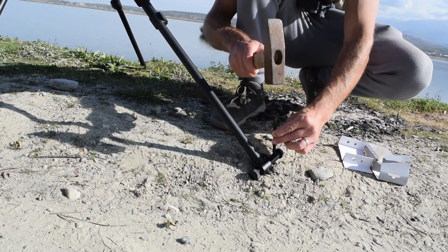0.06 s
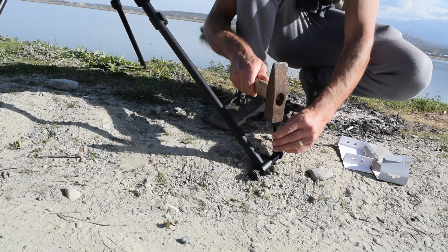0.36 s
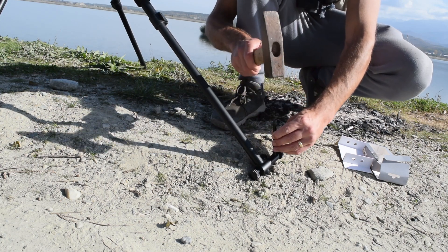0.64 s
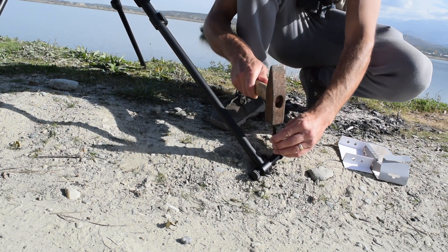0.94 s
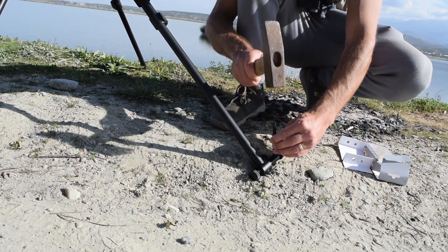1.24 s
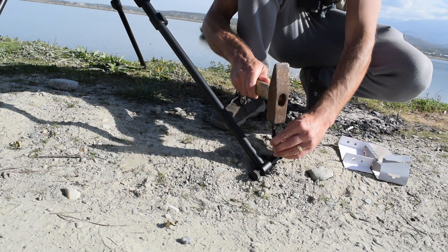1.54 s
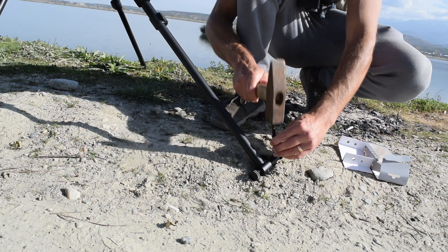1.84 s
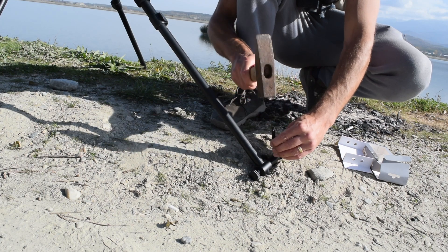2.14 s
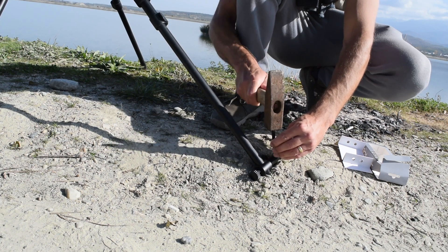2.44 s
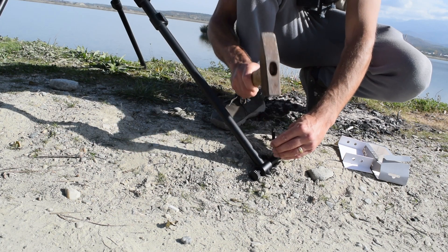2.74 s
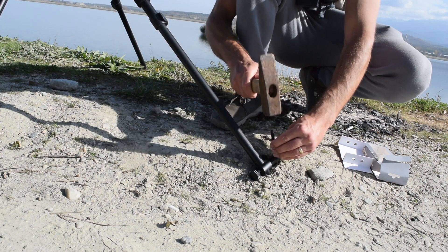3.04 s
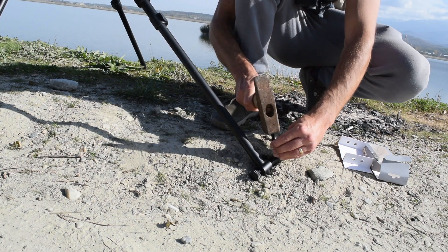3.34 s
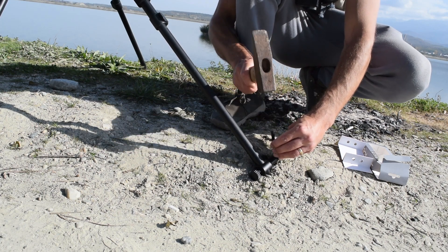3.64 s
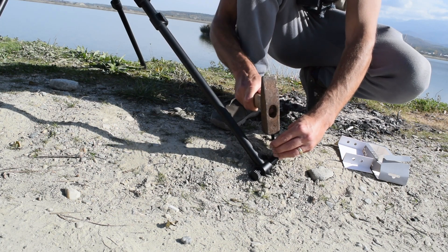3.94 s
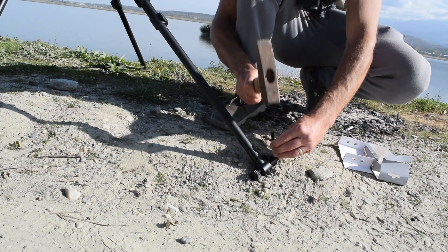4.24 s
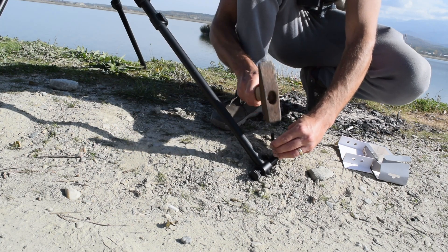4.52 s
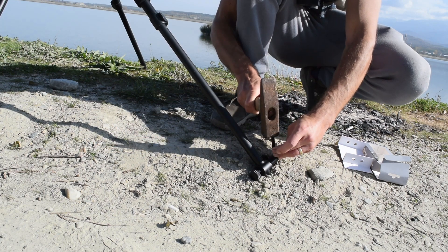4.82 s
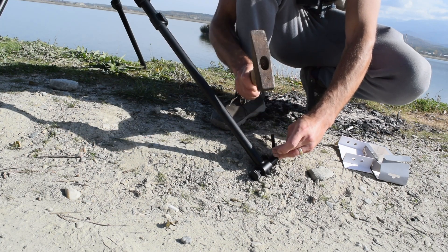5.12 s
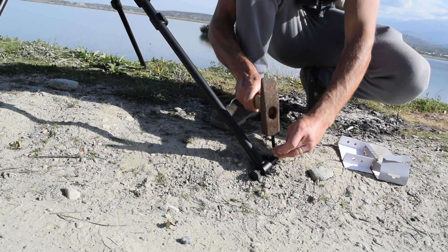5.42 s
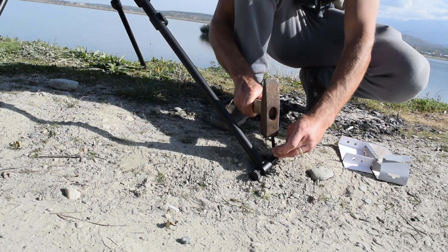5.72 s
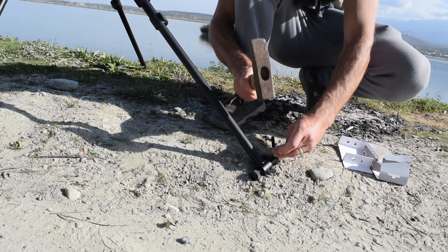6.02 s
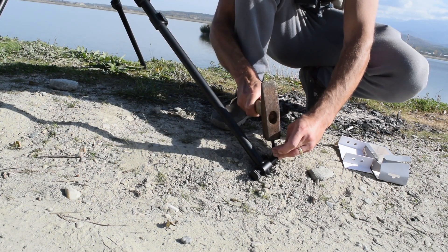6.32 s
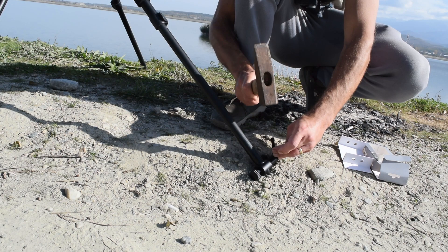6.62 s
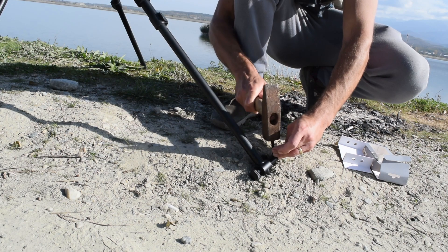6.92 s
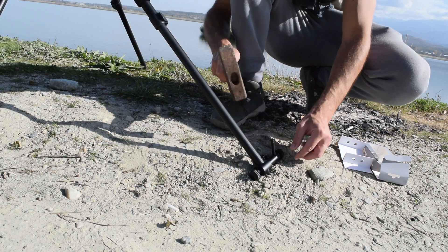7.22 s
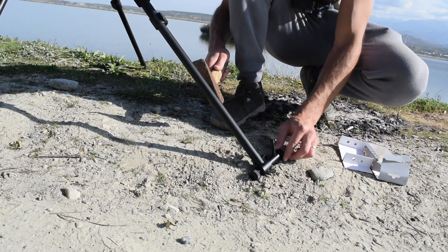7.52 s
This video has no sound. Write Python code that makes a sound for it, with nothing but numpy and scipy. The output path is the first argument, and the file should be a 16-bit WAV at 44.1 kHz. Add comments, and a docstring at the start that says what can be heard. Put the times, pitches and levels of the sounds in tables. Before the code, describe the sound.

Outdoors, close to the microphone, fourteen even hammer blows knock a metal pin into dry, hard soil. Every strike cracks and rings briefly with a bright steel ping, and the metal stand being pinned down clacks and settles right after. The pace quickens slightly, and the pings and thuds grow stronger toward the end. A very light breeze and a few thin, faraway bird notes lie underneath.

```python
"""A steel hammer drives a metal pin through the foot of a tube stand into hard ground, about twice a second.
Each impact cracks and excites the normal modes of the bodies it reaches: the soil thuds, the stand
knocks, and pin, hammer head and tube ring. The loose foot then rattles in inelastic bounces.
Behind the work are a light breeze and a few distant birds, in the open air by a lake.
The close microphone overloads on the sharpest peaks."""
import sys
import numpy as np
from scipy import signal
from scipy.fft import rfft, irfft, next_fast_len
from scipy.io import wavfile
from scipy.ndimage import uniform_filter1d

SR = 44100
rng = np.random.default_rng(int(sys.argv[2]) if len(sys.argv) > 2 else 0)


def digitize_waveform(pressure):
    """Quantize a signal to 16-bit integers and store it at the path in sys.argv[1].

    Rows of a 2-D input are taken as channels; values are limited to [-1, 1].
    """
    field = np.atleast_2d(pressure).T
    bounded = np.clip(field, -1, 1)
    quanta = np.round(bounded * 32767).astype(np.int16)
    wavfile.write(sys.argv[1], SR, quanta)


N = 333396

# Spectrum of the breeze: frequency_hz, relative_density_db
BREEZE_SPECTRUM = [(25, -6), (50, -7.5), (125, -1), (220, -5.5), (320, -8.5), (720, -7.5), (1300, -13),
                   (1650, -13.5), (2100, -16.5), (3100, -20.5), (3500, -16.5), (4000, -23), (10000, -32.5),
                   (16000, -42)]
# Likeness of the breeze at left and right: frequency_hz, coherence
BREEZE_COHERENCE = [(35, .3), (75, 1), (180, 1), (550, 0.37), (1650, 0.39), (4970, 0.038), (15000, 0.064)]
# Distant bird notes: start_s, length_s, start_hz, middle_hz, end_hz, level_db
BIRD_NOTES = [(.215, 0.039, 5100, 5400, 5430, -68), (3.232, .05, 7940, 7200, 6200, -65),
              (3.42, .055, 7600, 7000, 6200, -61), (3.52, 0.06, 7600, 6960, 6000, -60),
              (3.67, 0.051, 6900, 6550, 5900, -63.5), (5.076, 0.097, 3750, 3680, 3620, -66),
              (5.586, 0.0316, 4490, 4600, 4800, -58), (5.949, 0.028, 5680, 5650, 5340, -68.5),
              (5.985, 0.018, 4060, 4250, 4150, -61.5), (6.036, 0.13, 5360, 5370, 5230, -61)]

# Hammer blows and the ringing each excites:
# start_s, force_db, ping_db, overtone_db, clang_db, shimmer_db, tube_db
BLOWS = [(0.3229, -1, -19.5, -53.5, -33.5, -46.5, -53), (0.8553, 1.5, -19, -40, -26.5, -47, -59),
         (1.369, -3, -25.5, -36, -44.5, -36, -57), (1.904, -3, -29, -55, -29.5, -32.5, -47.5),
         (2.366, -2.5, -33, -30.5, -40, -30.5, -49), (2.8497, 1, -24.5, -35.5, -33.5, -37, -50.5),
         (3.3488, -1.5, -10.5, -23.5, -36, -28.5, -43), (3.8388, 4, -28, -29, -32, -30, -50.5),
         (4.3358, 1.5, -16, -31, -31.5, -48, -48), (4.8107, 2, -12.5, -33, -30, -39.5, -51.5),
         (5.2938, 6.5, -6, -31.5, -32, -38.5, -42), (5.7714, -1, -12, -33, -40.5, -41.5, -47),
         (6.2473, 3, -7, -34, -36, -32, -50), (6.7413, 0, -6.5, -31.5, -33.5, -36.5, -49.5)]
# Heavily damped modes of soil, stand and steel, heard at each contact: pitch_hz, relative_db, t60_s
SOIL_MODES = [(130, -22.5, 0.049), (206, -13, .06), (292, -6.5, 0.015), (371, -2, 0.055),
              (443.7, 4.5, 0.017), (488, 1, 0.035)]
STAND_MODES = [(732, -4, 0.05), (825, -3, 0.03), (938.6, -3, 0.044), (1108, -2.5, 0.052),
               (1213, -5.5, 0.028), (1294, -1.5, 0.054), (1437, -2.5, 0.053), (1604, -2, 0.069),
               (1666, -2, 0.046), (2090, 2, 0.022), (2333, -0.5, .035), (2630, -5, 0.023),
               (3251, -10, 0.036)]
CLINK_MODES = [(4080, 5, 0.032), (6320, -6.5, 0.031), (7900, -4.5, 0.019)]
# Longitudinal modes of the pin, damped by the ground: pitch_hz, relative_db
PING_MODES = [(7483, 0)]
OVERTONE_MODES = [(12308, 0), (15365, -20)]
# Freer modes of the steel of hammer head, pin and tube: pitch_hz, relative_db, t60_s
CLANG_MODES = [(4396, 0, .25), (4436, -6, .2)]
CROSS_CLANG_MODES = [(4847, 0, .25), (4861, -9, .2)]
SHIMMER_MODES = [(9522, 10, .085), (9609, 0, .38)]
TUBE_MODES = [(1647, 0, .65)]
# The pin's cross clang, freed as the hand slides down it: time_s, level_at_unit_force_db
GRIP_LEVELS = [(4.85, -51), (5.25, -35.5), (5.75, -40), (6.7, -39.5)]
# Spectra of steel on steel, crumbling soil, the foot's clack and grit: frequency_hz, relative_density_db
CRACK_SPECTRUM = [(200, -26), (1500, -7), (2500, 0), (3400, 0.5), (4200, 1), (5100, -0.5), (6800, -3.5),
                  (7900, 0.5), (10000, -6), (13000, -13.5), (15000, -29.5), (16500, -41)]
CRUMBLE_SPECTRUM = [(60, -27), (180, -5), (400, 1), (600, -0.5), (900, 2), (1600, -0.5), (2000, -6),
                    (2500, -8.5), (4500, -20.5), (9000, -31.5), (16000, -56)]
CLACK_SPECTRUM = [(200, -17.5), (1500, 0), (2600, -0.5), (3300, -3.5), (4200, 1), (5600, -9), (8500, -10.5),
                  (11000, -23.5), (13000, -29), (14500, -53.5)]
GRIT_SPECTRUM = [(300, -25), (900, -8), (2100, 9), (4000, -5), (8000, -20), (16000, -40)]
# The foot jumps and lands on the pin again: start_s, knock_db, crack_db
REBOUNDS = [(0.356, -41, -45), (0.8675, -30.5, -30), (1.3917, -32, -39.5), (1.928, -38.5, -48),
            (2.378, -25, -32.5), (2.871, -34.5, -42), (3.372, -30, -35.5), (3.8677, -31, -33.5),
            (3.8835, -40, -41), (4.3625, -31, -29.5), (4.3831, -38.5, -36.5), (4.394, -32.5, -37.5),
            (4.406, -39.5, -34.5), (4.833, -30, -44), (4.843, -33, -37), (5.32, -28, -42),
            (5.3364, -31, -27), (5.798, -28.5, -29.5), (6.278, -31, -32.5), (6.7592, -27.5, -35)]
# The stand rocks to rest: start_s, length_s, level_db
CHATTERS = [(.372, .025, -42.5), (1.456, 0.039, -46), (1.948, 0.044, -40), (2.915, 0.024, -43.5),
            (4.379, 0.041, -36), (4.851, .015, -39), (5.374, .03, -39.5), (6.292, 0.02495, -36.5)]
# Grit clicks under the hand: start_s, level_db
GRIT_TICKS = [(3.1822, -45.5), (5.885, -59)]

# Level difference between the microphone ports: frequency_hz, left_minus_right_db
PORT_BALANCE = [(420, -1.54), (690, 6.5), (1200, 1.8), (2800, 3.5), (3500, 1.54), (4900, 2.54), (6800, 4),
                (7500, 1), (8300, 0.7), (9600, 5), (12300, -4.5)]
# Phase difference between the ports: frequency_hz, left_lead_rad
PORT_PHASE = [(200, -0.13), (580, 0.8), (800, 0), (5700, -0.02), (6800, -.15), (7500, -0.03), (9600, -0.19),
              (12300, -0.24)]


def amp(db):
    """Amplitude ratio of a level in decibels."""
    return 10 ** (np.asarray(db) / 20)


def unit_rms(x):
    """Normalisation to an rms of 1."""
    return x / np.sqrt(np.mean(x ** 2) + 1e-20)


def curve_at(points, hz):
    """Interpolation of (frequency_hz, value) points on a logarithmic frequency axis."""
    frequencies, values = np.transpose(points)
    return np.interp(np.log(hz + 1), np.log(frequencies), values)


def seconds(length_s):
    """Uniformly sampled time."""
    return np.arange(int(length_s * SR)) / SR


def add(track, start_s, sound):
    """Linear superposition of a sound on the track."""
    part = track[round(start_s * SR):][:len(sound)]
    part += sound[:len(part)]


def filtered(x, response):
    """Linear filtering: the spectrum is multiplied by a frequency response."""
    size = next_fast_len(N + 8192)
    return irfft(rfft(x, size) * response(np.fft.rfftfreq(size, 1 / SR)), size)[..., :N]


def lowpass(x, corner_hz):
    """Third-order roll-off of the treble."""
    return signal.sosfilt(signal.butter(3, corner_hz, fs=SR, output="sos"), x)


def minimum_phase(spectrum, size=512):
    """Folding the cepstrum gives the most compact causal impulse response with this spectrum."""
    cepstrum = irfft(np.log(amp(curve_at(spectrum, np.fft.rfftfreq(size, 1 / SR)))))
    cepstrum[1:size // 2] *= 2
    cepstrum[size // 2 + 1:] = 0
    return irfft(np.exp(rfft(cepstrum)))


def breeze(level_db, flicker_db):
    """Partially coherent noise, nearly mono in the bass and wide in the treble, flickers slightly."""
    def mid_side_response(hz):
        angle = np.arccos(np.clip(curve_at(BREEZE_COHERENCE, hz), 0, 1)) / 2
        return amp(curve_at(BREEZE_SPECTRUM, hz)) * [np.cos(angle), np.sin(angle)]

    spectra = signal.stft(rng.standard_normal((2, N)), nperseg=512)[2]
    patches = uniform_filter1d(rng.standard_normal(spectra.shape[1:]), size=5, axis=0)  # over frequency
    patches = uniform_filter1d(patches, size=18, axis=1)  # over time
    noise = signal.istft(spectra * amp(flicker_db * unit_rms(patches)), nperseg=512)[1][:, :N]
    mid, side = filtered(noise, mid_side_response)
    return amp(level_db) * unit_rms(np.array([mid + side, mid - side]))


def birds():
    """Frequency modulation: each thin whistle glides through three pitches and wavers a little."""
    track = np.zeros(N)
    for start_s, length_s, start_hz, middle_hz, end_hz, level_db in BIRD_NOTES:
        progress = seconds(length_s) / length_s
        glide_hz = np.polyval(np.polyfit([0, .5, 1], [start_hz, middle_hz, end_hz], 2), progress)
        waver = 0.01 * unit_rms(lowpass(rng.standard_normal(len(progress)), corner_hz=250))
        phase = 2 * np.pi * np.cumsum(glide_hz * (1 + waver)) / SR
        add(track, start_s, amp(level_db - 3) * np.sin(np.pi * progress) * np.sin(phase))
    return track


def ring(modes, t, scatter_db):
    """Free vibration is a sum of damped modes, whose strengths and signs vary with each strike."""
    sound = np.zeros(len(t))
    for hz, db, t60_s in modes:
        sign = rng.choice([-1, 1])
        envelope = amp(db + scatter_db * rng.normal() - 60 * t / t60_s)
        sound += sign * envelope * np.cos(2 * np.pi * hz * t)
    return sound


def burst(t, t60_s):
    """Exponentially decaying noise: the crunch of a contact."""
    return rng.standard_normal(len(t)) * amp(-60 * t / t60_s)


def contact_force(t, t60_s, impulse_db, corner_hz):
    """Compliance low-passes the force: a crunch plus an impulse, its energy set against the crunch's."""
    crunch = burst(t, t60_s)
    impulse = amp(impulse_db) * np.linalg.norm(crunch) * (t == 0)
    return lowpass(crunch + impulse, corner_hz)


def struck(force, impulse_response):
    """Convolution gives a body's response to a force, scaled here to rms 1 over its first 10 ms."""
    sound = signal.fftconvolve(force, impulse_response)[:len(force)]
    return sound / np.sqrt(np.mean(sound[:SR // 100] ** 2))


def impact(thud_db, knock_db, crack_db, tilt_db_per_octave, spectrum,
           force_t60_s, crack_t60_s, grit_db, grit_t60_s, clink_db):
    """A brief force is broadband: it excites soil, stand and steel, and cracks with a gritty tail."""
    t = seconds(.25)
    stand_modes = [(hz, db + tilt_db_per_octave * np.log2(min(hz, 2000) / 1000), t60_s)
                   for hz, db, t60_s in STAND_MODES]
    soil_force = contact_force(t, force_t60_s, impulse_db=0, corner_hz=1500)
    thud = struck(soil_force, ring(SOIL_MODES, t, scatter_db=2.5))
    stand_force = contact_force(t, force_t60_s, impulse_db=3.5, corner_hz=3950)
    knock = struck(stand_force, ring(stand_modes, t, scatter_db=3))
    crunch = burst(t, crack_t60_s) + amp(grit_db) * burst(t, grit_t60_s)
    crack = struck(crunch, minimum_phase(spectrum))
    clink = amp(clink_db) * ring(CLINK_MODES, t, scatter_db=1.5) * (1 - np.exp(-t / 0.00026))
    return amp(thud_db) * thud + amp(knock_db) * knock + amp(crack_db) * (crack + clink)


def crumble(t):
    """Dry soil yields around the pin and radiates a burst of coloured noise."""
    return struck(burst(t, t60_s=0.1), minimum_phase(CRUMBLE_SPECTRUM))


def hammer_blows(body_share=0.27, topsoil_depth=0.26):
    """The point of impact weights the steel's modes; firmer soil thuds louder and damps the pin sooner."""
    track, t = np.zeros(N), seconds(.7)
    for start_s, force_db, ping_db, overtone_db, clang_db, shimmer_db, tube_db in BLOWS:
        depth = start_s * SR / N  # fraction of the pin's way down
        looseness = np.clip(1 - depth / topsoil_depth, 0, 1)
        body_db = body_share * force_db  # soil and stand follow the force only in part
        soil_db = body_db - 2.5 * looseness
        blow = impact(thud_db=-34.5 + 13.5 * depth + soil_db, knock_db=-18 + 0.5 * depth + body_db,
                      crack_db=-17.5 + force_db, tilt_db_per_octave=-2 + 14 * looseness,
                      spectrum=CRACK_SPECTRUM, force_t60_s=0.011, crack_t60_s=0.016,
                      grit_db=-18, grit_t60_s=0.068, clink_db=-8)
        add(track, start_s, blow)
        add(track, start_s, amp(-27.5 + 5 * depth + soil_db) * crumble(t))
        ping_t60_s, overtone_t60_s = .145 - .07 * depth, .1
        cross_clang_db = np.interp(start_s, *np.transpose(GRIP_LEVELS)) + force_db
        families = [([(hz, db, ping_t60_s) for hz, db in PING_MODES], ping_db),
                    ([(hz, db, overtone_t60_s) for hz, db in OVERTONE_MODES], overtone_db),
                    (CLANG_MODES, clang_db), (SHIMMER_MODES, shimmer_db), (TUBE_MODES, tube_db),
                    (CROSS_CLANG_MODES, cross_clang_db)]
        steel = sum(amp(db) * ring(modes, t, scatter_db=1.5) for modes, db in families)
        add(track, start_s, steel * (1 - np.exp(-t / 0.00065)))
    return track


def foot_tap(knock_db, crack_db):
    """A softer impact excites less treble: the loose foot clacks on the pin and scuffs the soil."""
    clack = impact(knock_db - 7, knock_db, crack_db, tilt_db_per_octave=-4.5, spectrum=CLACK_SPECTRUM,
                   force_t60_s=.007, crack_t60_s=0.02, grit_db=-20.5, grit_t60_s=0.05, clink_db=-9)
    return clack + amp(knock_db - 5.5) * crumble(seconds(.25))


def foot_rattle(bounces=4, first_flight_s=.017, restitution=.85, knock_loss_db=9, crack_loss_db=11.5):
    """Inelastic collisions lose energy, so each bounce is weaker and, on average, shorter."""
    track = np.zeros(N)
    for landing_s, knock_db, crack_db in REBOUNDS:
        for k in range(bounces):
            add(track, landing_s, foot_tap(knock_db - knock_loss_db * k, crack_db - crack_loss_db * k))
            landing_s += first_flight_s * restitution ** k * np.exp(.12 * rng.normal())
    return track


def stand_chatter(gap_s=.01, fade_db=3):
    """Damped rocking: the stand comes to rest in quick, dull, uneven taps."""
    track = np.zeros(N)
    for start_s, length_s, level_db in CHATTERS:
        for delay_s in np.arange(0, length_s, gap_s):
            knock_db = level_db - fade_db * delay_s / length_s + 1.3 * rng.normal()
            jitter_s = .15 * gap_s * rng.normal()
            add(track, start_s + delay_s + jitter_s, foot_tap(knock_db, crack_db=knock_db - 22.5))
    return track


def grit_ticks():
    """Grains of grit click with too little momentum to excite the stand."""
    track, t = np.zeros(N), seconds(.05)
    for start_s, level_db in GRIT_TICKS:
        add(track, start_s, amp(level_db) * struck(burst(t, t60_s=0.007), minimum_phase(GRIT_SPECTRUM)))
    return track


def microphone_ports(x):
    """A near source reaches the two ports with frequency-dependent differences of level and phase."""
    half = np.array([[.5], [-.5]])
    return filtered(x, lambda hz: amp(half * curve_at(PORT_BALANCE, hz))
                    * np.exp(1j * half * curve_at(PORT_PHASE, hz)))


def scene():
    """Free-field superposition: the work close by, birds and breeze far behind, and no reflections."""
    work = hammer_blows() + foot_rattle() + stand_chatter() + grit_ticks()
    return microphone_ports(work) + birds() + breeze(level_db=-54.5, flicker_db=1.58)


def record(dry):
    """Saturation rounds off peaks near full scale; band limiting cuts the deepest bass and top treble."""
    ceiling, bottom_hz, top_hz = .93, 60, 16000
    clipped = dry / (1 + np.abs(dry / ceiling) ** 8) ** (1 / 8)
    low_cut = signal.sosfilt(signal.butter(3, bottom_hz, "highpass", fs=SR, output="sos"), clipped)
    return filtered(low_cut, lambda hz: 1 / np.sqrt(1 + (hz / top_hz) ** 200))


dry = scene()
out = record(dry)
digitize_waveform(out)
```